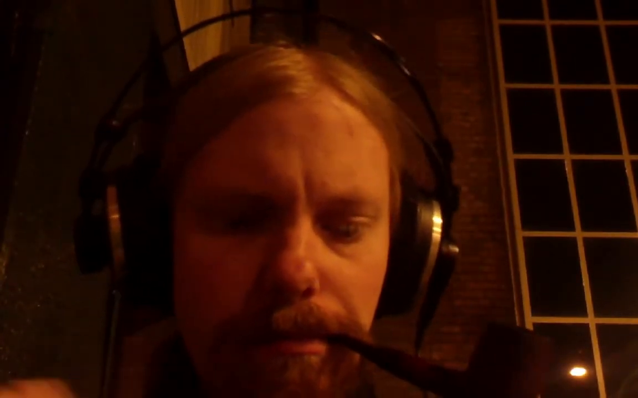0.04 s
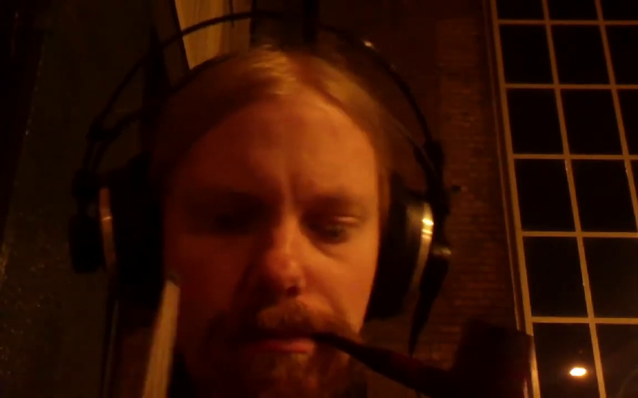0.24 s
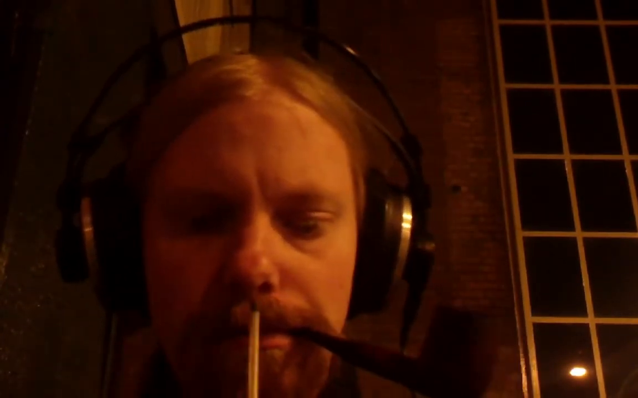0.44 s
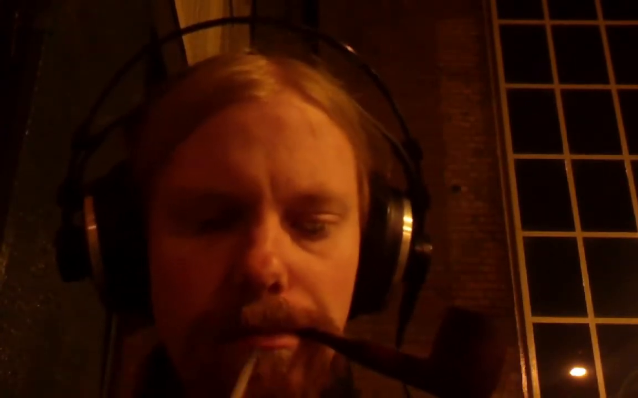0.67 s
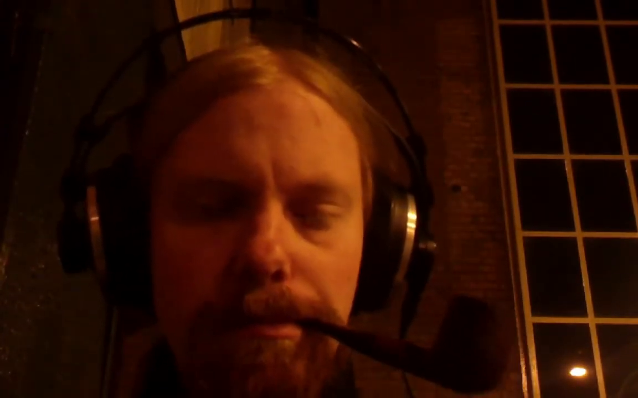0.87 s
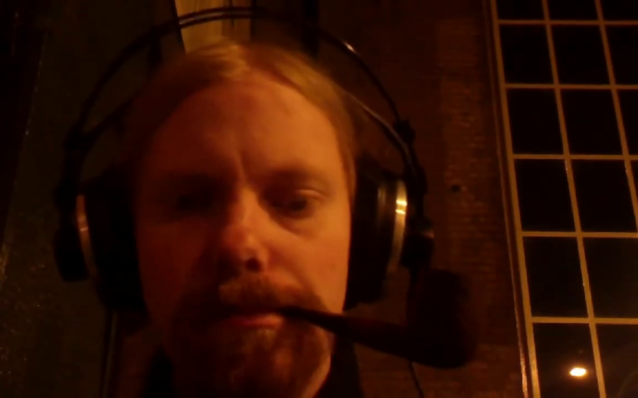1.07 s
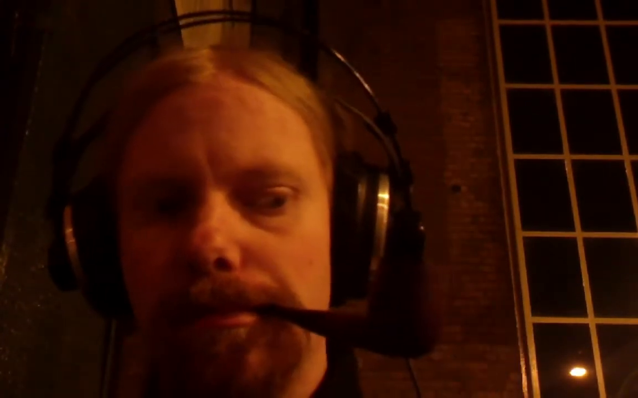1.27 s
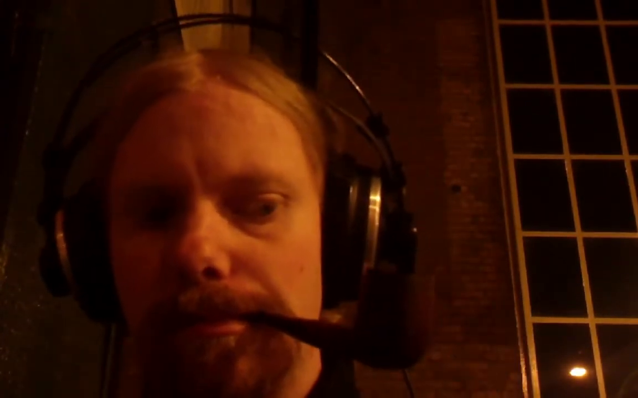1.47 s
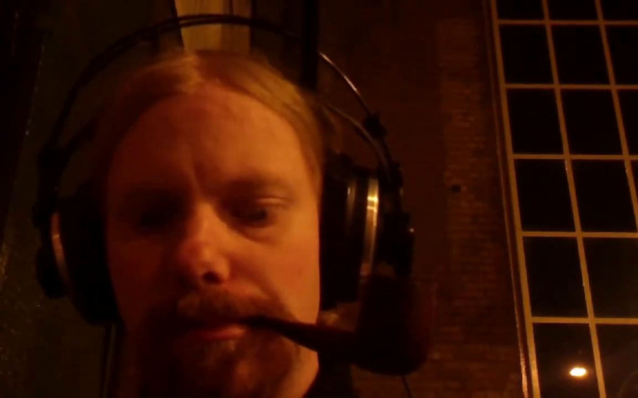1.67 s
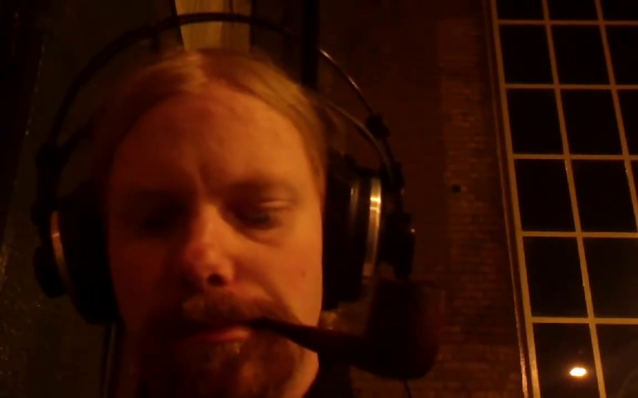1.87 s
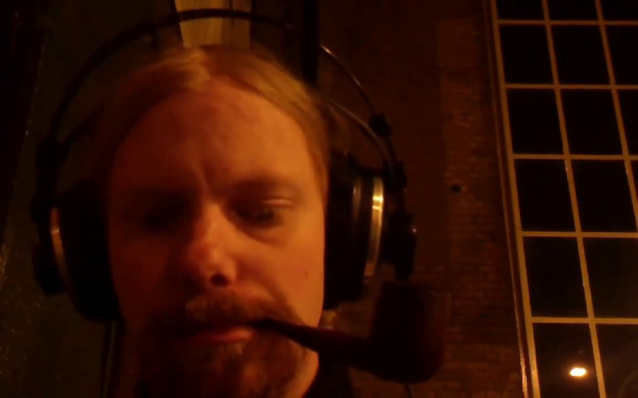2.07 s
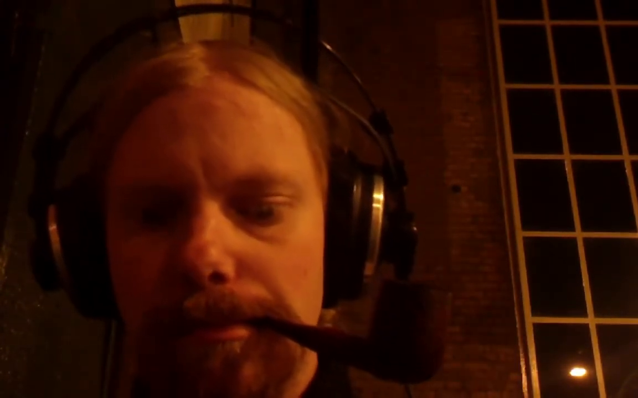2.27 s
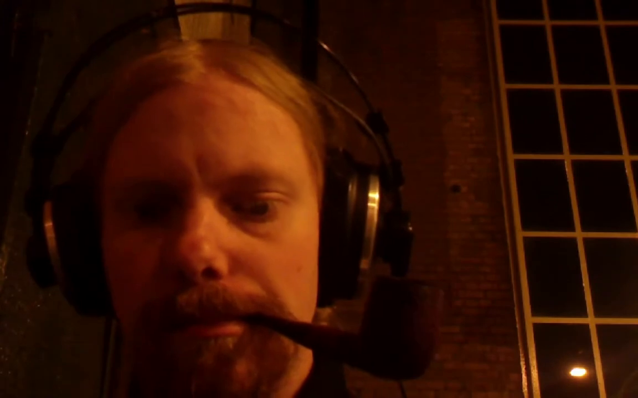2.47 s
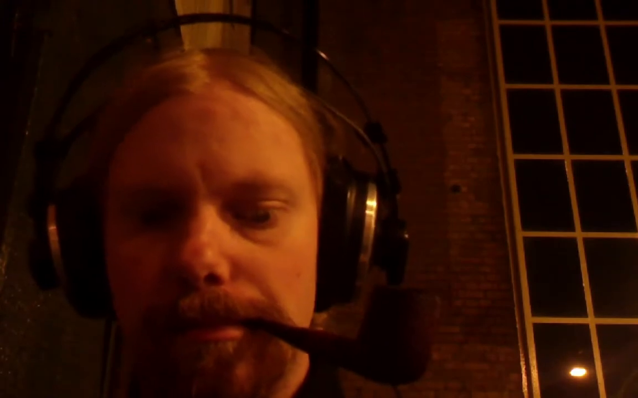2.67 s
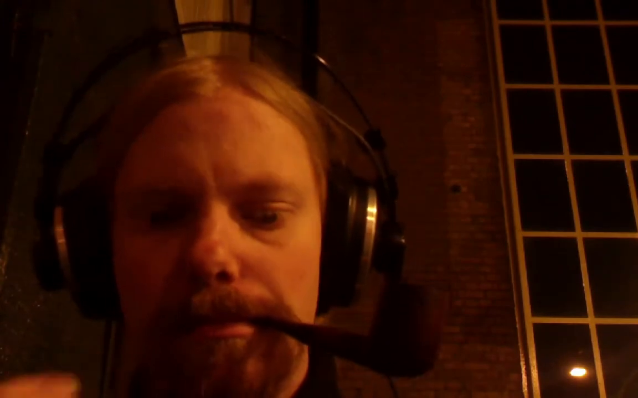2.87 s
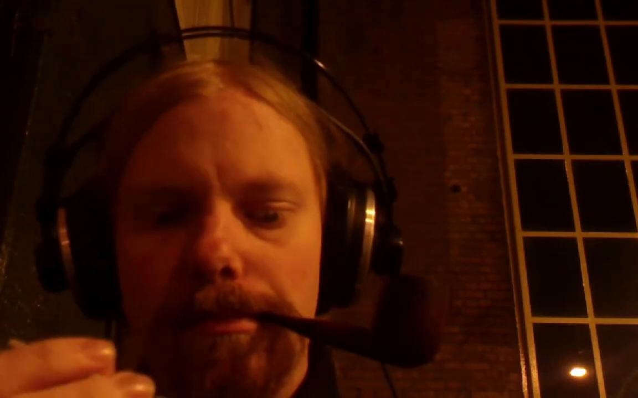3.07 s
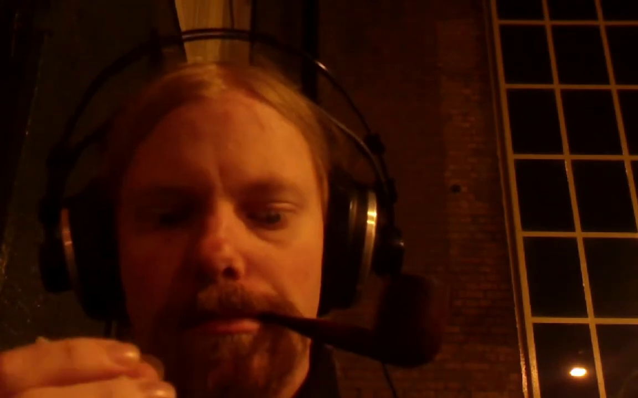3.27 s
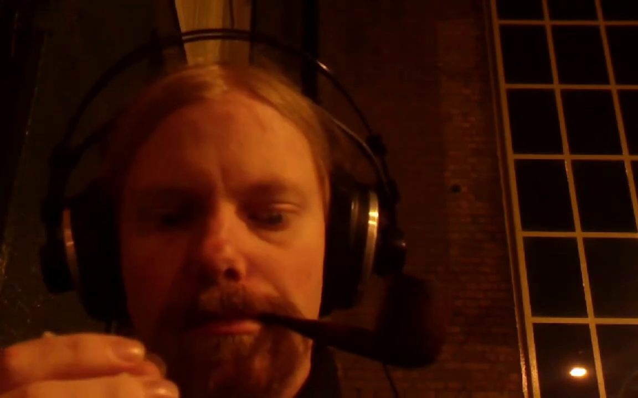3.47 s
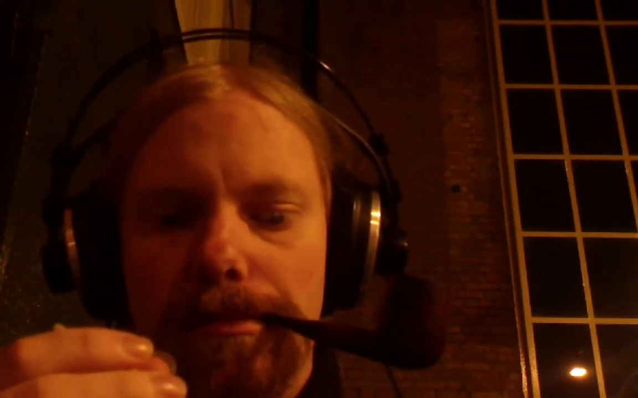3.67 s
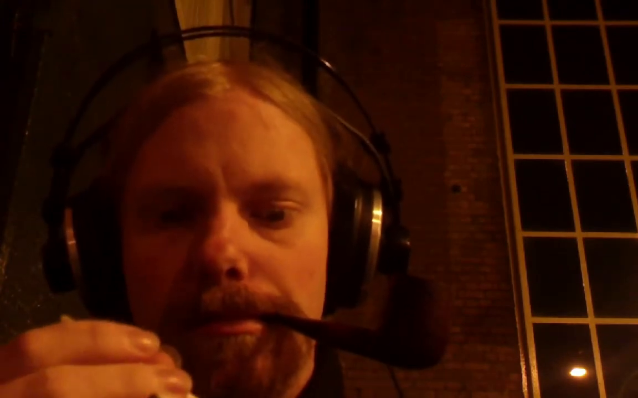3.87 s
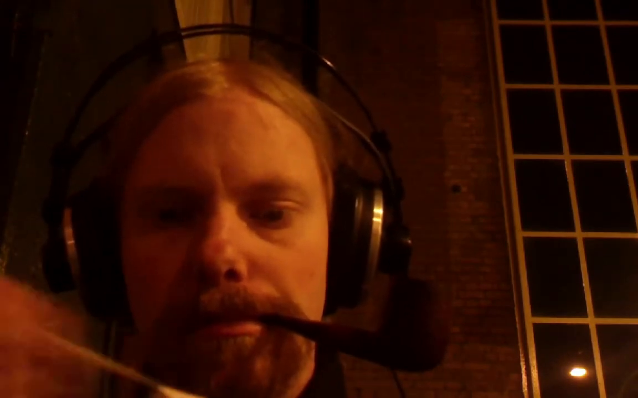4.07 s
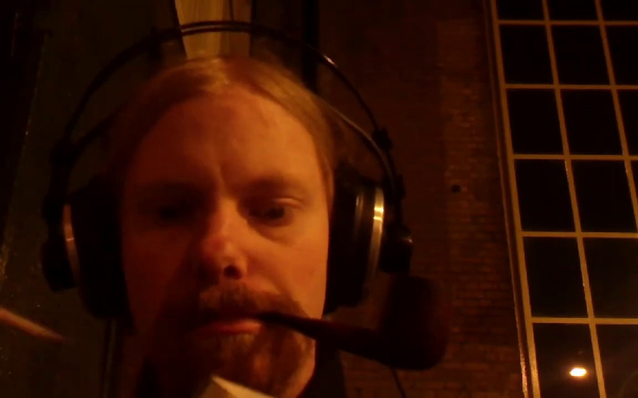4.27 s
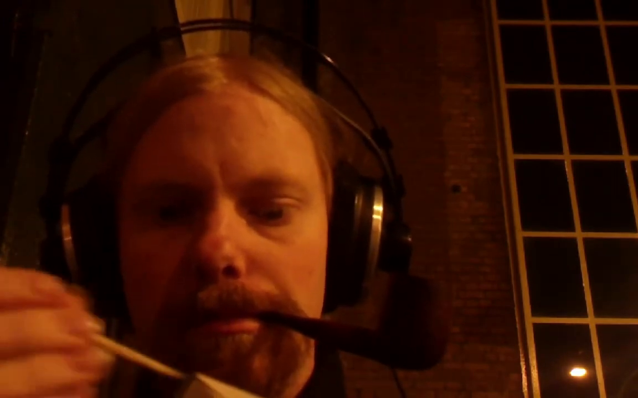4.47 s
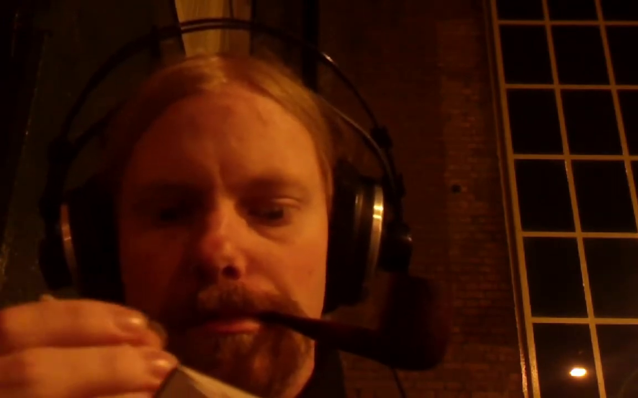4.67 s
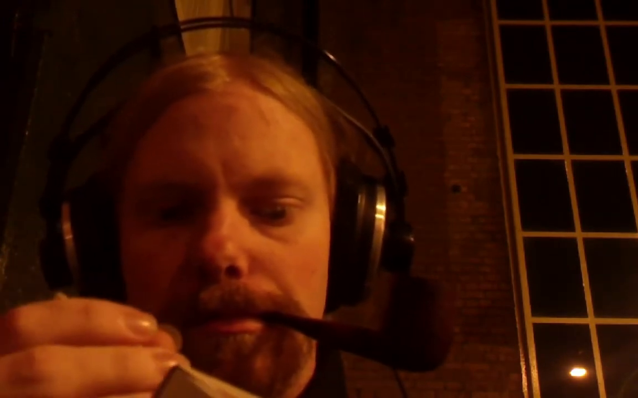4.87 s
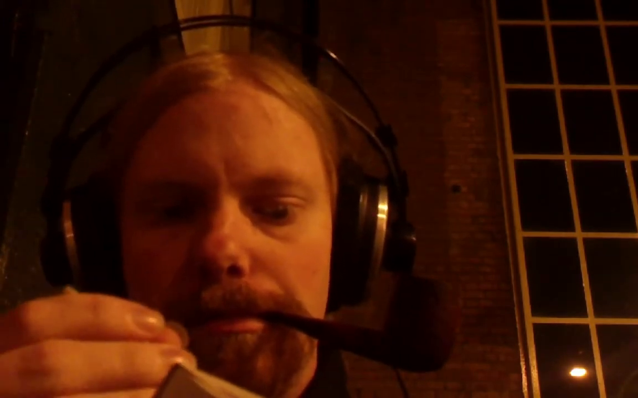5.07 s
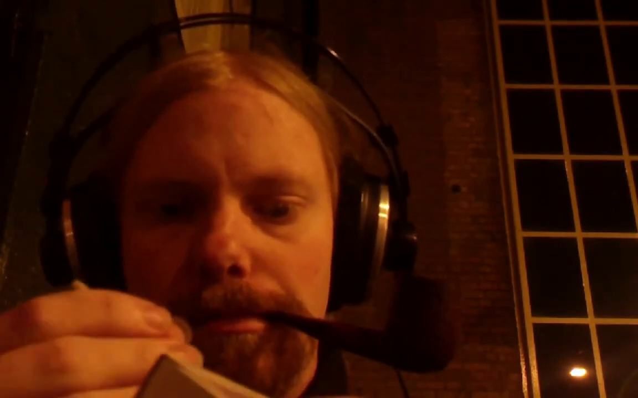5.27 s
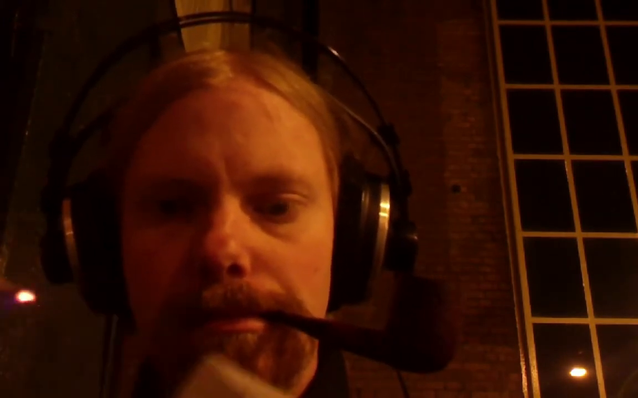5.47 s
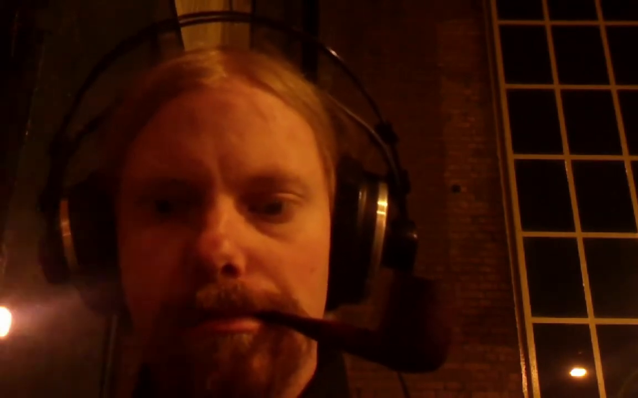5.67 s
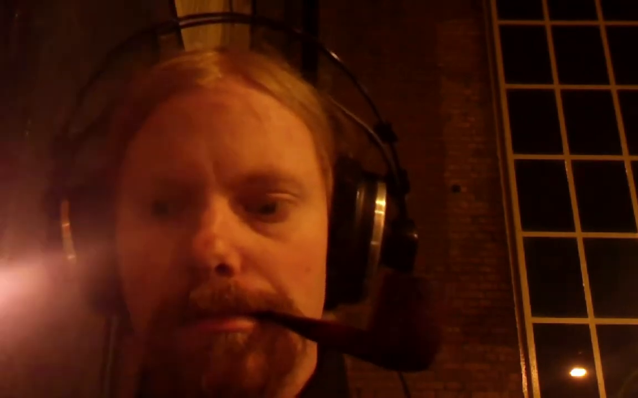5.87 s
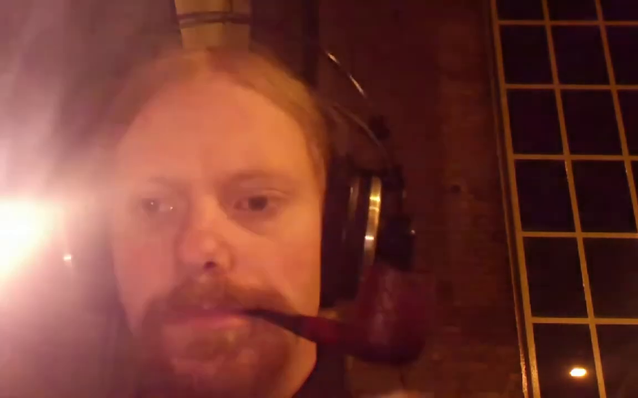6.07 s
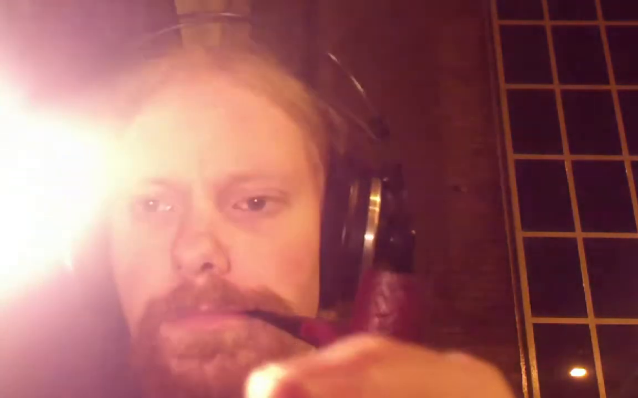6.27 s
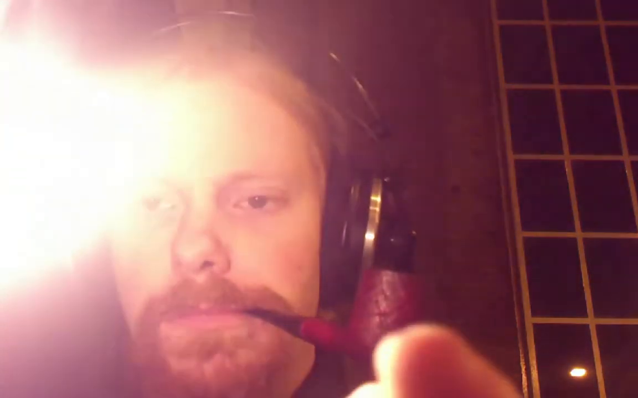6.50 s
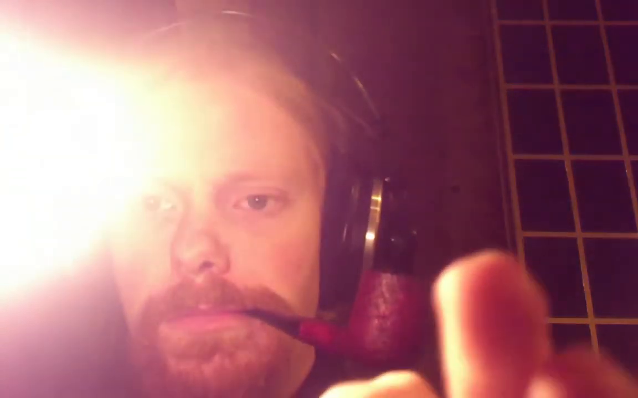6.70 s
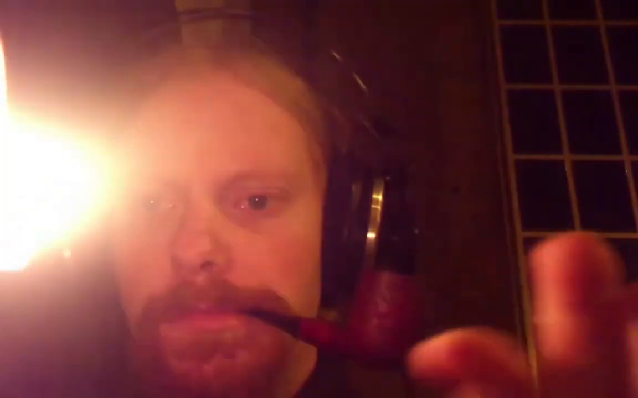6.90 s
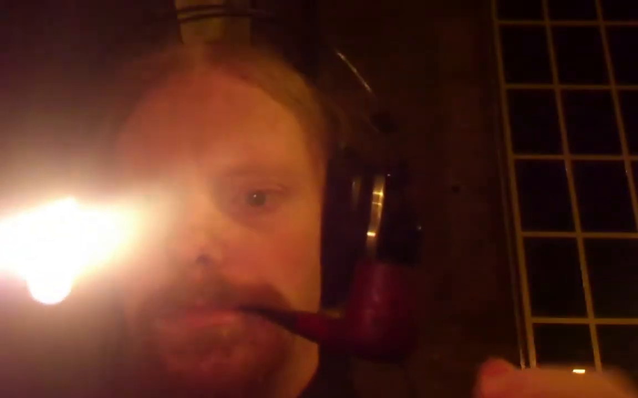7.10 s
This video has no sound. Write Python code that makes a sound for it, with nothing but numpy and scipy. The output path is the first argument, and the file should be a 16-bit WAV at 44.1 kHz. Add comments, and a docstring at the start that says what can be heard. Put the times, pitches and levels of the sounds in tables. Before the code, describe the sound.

A quiet room with low rumble, a little hiss and wavering mains hum, heard very close in stereo. A very faint mid-pitched tone lasts until 0.3 s, when a matchbox drawer slides shut with a short, gritty, boxy scrape ending at 0.42. From 0.55 to 2.9 fingers turn the box: soft cardboard swipes, hollow little taps, dry matchstick ticks, the sharpest click at 2.68. Isolated ticks follow near 3.2, 3.5 and 3.55. At 4.02 a very short scratch misses, ending in a snap; a woody tick comes at 4.73 and light taps at 5.2. At 5.32 a harsh, much louder strike cracks and catches. A faint fizz grows, with pops from 5.67, and flares in crackling, sputtering gas around 6.0-6.15. Dull low puffs land at 6.2 and 6.3, then a weakening sizzle ends with a tiny spurt near 6.77, leaving a faint finger rub at 6.95 and room rumble.

```python
"""A matchbox is slid shut and turned in the fingers, then a match is struck twice along its side; the second
stroke catches, and the head fizzes, flares and puffs alight, close to a small two-port microphone.
Juddering grit rings the modes of the box; knocks, ticks and dragging skin are the fingers; dense tiny bursts,
sputtering gas, pops and dull puffs are the fire. Low room rumble and mains hum lie under it, and a faint
tone sounds until the drawer moves."""
import sys
import numpy as np
from scipy import signal
from scipy.fft import rfft, irfft, next_fast_len
from scipy.io import wavfile
from scipy.ndimage import uniform_filter1d, map_coordinates

SR = 44100
rng = np.random.default_rng(int(sys.argv[2]) if len(sys.argv) > 2 else 0)


def unload_wav(signal):
    """Save mono or channel-first audio to the path in sys.argv[1] as 16-bit WAV at rate SR, clipped to [-1, 1]."""
    wavfile.write(
        sys.argv[1],
        SR,
        np.round(np.clip(np.atleast_2d(signal).T, -1, 1) * 32767).astype(np.int16),
    )


N = 314874
T = np.arange(N) / SR
M = next_fast_len(N, True)  # transform length
HZ = np.maximum(np.arange(M // 2 + 1) * SR / M, 1)

# strokes: the drawer slides shut, the match misses, the match catches:
# (start [s], attack [s], end [s], release [s], level [dB], easing midway [dB],
#  low body at the start [dB], low body at the end [dB])
STROKES = [(.298, .023, .421, .012, -36.3, 2.6, 2, 2), (4.021, .022, 4.073, .009, -36, 1.3, -5, 5),
           (5.318, .032, 5.384, .006, -28.3, 1, -1.5, 4)]
# pockets of gas pop on the head: (time [s], peak level [dB], brightness [Hz], t60 [s])
POPS = [(5.672, -31, 2400, .014), (5.878, -37, 7000, .012), (5.900, -34, 8000, .008),
        (6.005, -29, 1800, .012), (6.023, -30, 900, .018), (6.039, -29.5, 1000, .012),
        (6.058, -28, 800, .008), (6.085, -24, 2200, .028), (6.094, -25, 7000, .007),
        (6.110, -24.5, 5000, .009), (6.144, -30, 5000, .012), (6.150, -32, 2500, .008),
        (6.167, -33, 11000, .005), (6.1965, -28, 4000, .011)]
# the fire on the head flares, is spent, and dies away with this time constant
FLARE_S, SPENT_S, DIE_S = 6.06, 6.772, 0.015


def matchbox():
    """The drawer and both strokes scrape and ring the box; sudden snags within them knock it harder."""
    # modes of the box with its drawer open: (frequency [Hz], width [Hz], level [dB])
    drawer_open = [(960, 150, -7), (1170, 160, 12), (1900, 400, 1), (2500, 500, -3), (2900, 400, -7),
                   (3750, 550, 4.5), (4200, 400, -3), (5450, 600, -4), (7200, 1200, -9), (9800, 1900, -7)]
    # the same modes once the drawer is home: (frequency [Hz], width [Hz], level [dB])
    drawer_shut = [(920, 140, 4), (1230, 150, -7), (1800, 350, -3), (2320, 350, 2), (2760, 400, -6),
                   (3620, 430, -1), (4200, 500, -6), (5530, 1300, -5), (6900, 1200, -4), (9550, 1500, -0.5)]
    # modes of the box as held for the failed stroke: (frequency [Hz], width [Hz], level [dB])
    miss_box = [(900, 72, 4.5), (1100, 180, 1.5), (1780, 230, 3.5), (2410, 220, -4), (2620, 170, -14),
                (3520, 400, -7), (4100, 460, -14), (5630, 700, -15.5), (9900, 980, -6)]
    # modes of the box as held for the stroke that catches: (frequency [Hz], width [Hz], level [dB])
    strike_box = [(595, 29, 6.5), (776, 170, 6.5), (1170, 167, 10), (1780, 200, 6), (2400, 310, 5.5),
                  (3400, 1600, -2), (4100, 300, -1), (5600, 500, 0), (7270, 960, -3), (9360, 1150, 4.5)]
    # the drawer jerks, or the head snags on the strip or snaps off its edge:
    # (time [s], peak level [dB], brightness [Hz], t60 [s])
    snags = [(.3178, -25, 1700, .016), (.410, -34, 2300, .018), (.422, -30, 1000, .025),
             (4.0415, -27, 11000, .02), (4.062, -29, 1800, .025), (4.0726, -16.5, 1150, .013),
             (5.3500, -20, 9000, .015), (5.3555, -15, 10000, .003), (5.3635, -21, 900, .02),
             (5.3658, -5.8, 9500, .014), (5.3822, -16, 2200, .009)]
    slide, miss, strike = STROKES
    out = scrape(slide, drawer_open, drawer_shut, rate=9000, spread_db=0.5, grit_db=-12, judder_db=1.3, count=3)
    out = out + scrape(miss, miss_box, miss_box, rate=8300, spread_db=2.5, grit_db=-11, judder_db=1.8)
    out = out + scrape(strike, strike_box, strike_box, rate=15000, spread_db=2.5, grit_db=-6.0, judder_db=0.7)

    miss_cut_hz = 700  # the tightly held box has no note below this
    miss_response = body(miss_box) * bass_cut(miss_cut_hz) ** 3
    rings = [irfft(response) for response in (body(drawer_open), miss_response, body(strike_box))]
    for snag in snags:
        stroke_index = np.searchsorted([miss[0], strike[0]], snag[0])
        out = out + burst(*snag, rings[stroke_index])
    return out


def scrape(stroke, first, last, rate, spread_db, grit_db, judder_db, count=1):
    """Grit slips unevenly and rings modes gliding from first to last, as contact builds, eases and lets go."""
    start, attack, end, release_s, db, easing_db, body_start_db, body_end_db = stroke
    press_power = 1.4  # pressure builds along a power curve
    press = np.clip((T - start) / attack, 0, 1) ** press_power
    along = np.clip((T - start - attack) / (end - start - attack), 0, 1)
    # pressure drops fast and leaves a light drag
    drag_db, drag_s = -17, 0.064
    let_go = np.maximum(release(end, release_s), undb(drag_db) * release(end, drag_s))

    judder_hz = 330
    slips = grains(rate, spread_db) * undb(judder_db * walk(judder_hz))
    grit = undb(grit_db) * resonance(7600, 9300)
    sound = 0
    for k, modes in enumerate(np.linspace(first, last, count)):
        nearness = np.maximum(1 - np.abs(along * (count - 1) - k), 0)  # crossfade between sets of modes
        sound = sound + unit(through(slips, body(modes) + grit)) * nearness

    body_hz = 1970  # below this the walls sound, and their level shifts along the stroke
    low = through(sound, 1 / (1 + (HZ / body_hz) ** 8))
    sound = sound - low + low * undb(body_start_db + (body_end_db - body_start_db) * along)
    return sound * press * let_go * undb(db - easing_db * np.sin(np.pi * along))


def fingers(rub_db=-0.5, skin_db=-1.5, grip_treble_db=-6.0):
    """Soft knocks, dry ticks and skin dragging over cardboard; the note of the box changes with the grip."""
    # what a tapped box rings with: (frequency [Hz], width [Hz], level [dB])
    tap_box = [(730, 94, -2), (1010, 220, 1), (1840, 150, -8), (2600, 500, -11)]
    # fingertips knock the box: (time [s], peak level [dB], brightness [Hz])
    taps = [(.303, -41, 1100), (.608, -39.5, 1000), (0.663, -46, 1200), (1.178, -43, 750),
            (1.346, -42, 990), (1.379, -38, 800), (2.025, -38, 1190), (2.232, -45, 900), (2.303, -43, 1050),
            (2.313, -35.5, 850), (2.407, -40, 680), (2.711, -41.5, 750), (5.190, -41.5, 1000),
            (5.204, -40.5, 960), (5.423, -41, 1000)]
    # the matchstick ticks against the box: (time [s], peak level [dB], brightness [Hz],
    # ring of the stick [Hz], its level [dB], rattle afterwards relative to the contact [dB])
    ticks = [(.567, -45, 4500, 4000, 0, -24), (.912, -45, 2500, 3000, -4, -24),
             (1.384, -39, 4000, 4200, -4, -22), (2.027, -40, 2200, 4000, -6, -24),
             (2.125, -44, 12000, 12500, -4, -24), (2.233, -42, 3000, 3800, 0, -28),
             (2.313, -35, 2500, 2500, -2, -30), (2.642, -34, 9500, 8000, -4, -28),
             (2.6724, -40, 5000, 4200, -2, -20), (2.6759, -20.5, 4500, 4600, -2, -36),
             (3.1924, -32, 1900, 2400, -5, -31), (3.4880, -34, 3000, 3580, 4, -35),
             (3.555, -38.5, 1900, 3600, -4, -31), (4.7329, -28.5, 1900, 4120, 9, -40),
             (5.204, -46, 3000, 3700, -2, -26)]
    # fingers swipe over the cardboard: (middle [s], length [s], level [dB], treble relative to it [dB],
    # note of the hollow box [Hz], its relative level [dB], rasp of the wall, relative [dB])
    swipes = [(0.142, 0.14, -60.5, -1.5, 1020, -26, -10), (0.597, 0.026, -55.5, 0.5, 990, -13, -12),
              (0.799, 0.056, -47.5, -3.5, 963, -5.5, -13.5), (1.019, 0.073, -54, -4.5, 644, -10, -12),
              (1.134, 0.077, -55, 3.5, 650, -21, -15), (1.285, 0.09, -68.5, 7, 750, -5, -15),
              (1.378, 0.048, -50.5, -8, 750, -3.5, -11), (2.019, 0.051, -59, -5, 810, -3, -6.5),
              (2.296, 0.04, -51.5, -6, 1020, -3, 0), (2.835, 0.03, -62.5, 2, 1000, -12, -15),
              (4.13, 0.09, -63, 0, 950, -12, -8), (6.953, 0.27, -64, -6, 920, -2.5, -21)]
    # colour of rubbed cardboard: (frequency [Hz], level [dB])
    rub_colour = [(350, -17), (600, -4), (1010, -4.5), (1250, -10), (1510, -10), (2300, -13), (3700, -14),
                  (4790, -16.5), (7000, -17.5), (9500, -25), (15400, -60)]

    box_ring = irfft(body(tap_box))
    hits = sum(burst(s, db, hz, 0.0026, box_ring, order=2) for s, db, hz in taps)
    hits = hits + sum(tick(*row) for row in ticks)

    drag = grains(9000, spread_db=1.6) * undb(0.75 * walk(160))
    hollow_width_hz = 260
    low, hollow, rasp = grip(), 0, 0
    high = low * undb(grip_treble_db)
    for s, length, db, treble_db, note_hz, note_db, rasp_db in swipes:
        speed = np.exp(-2 * ((T - s) / length) ** 2)
        low = np.hypot(low, speed * undb(db))
        high = np.hypot(high, speed * undb(db + treble_db))
        note = unit(through(drag, resonance(note_hz, hollow_width_hz) ** 2))
        hollow = hollow + note * speed * undb(db + note_db)
        rasp = rasp + speed * undb(db + rasp_db)

    # the wall of the box rasps under a dragging finger
    wall = unit(through(grains(1000, spread_db=1.8), resonance(2220, 1000) ** 2)) * rasp
    cardboard = unit(through(drag, colour(rub_colour))) * undb(rub_db) * low
    skin = unit(through(grains(9000, spread_db=2.0), resonance(10040, 5100) ** 2)) * undb(skin_db) * high
    return hits + cardboard + hollow + wall + skin


def tick(s, db, hz, stick_hz, stick_db, rattle_db, size=8192):
    """One hard contact and a short rattle ring the box and the free end of the stick; mid and side."""
    # what the box rings with under the stick: (frequency [Hz], width [Hz], level [dB])
    tick_box = [(920, 240, 3), (1850, 300, 0), (2130, 300, 1), (3600, 260, -2), (5300, 800, -13),
                (7200, 600, -19), (10000, 2200, -6.5)]
    stick_width_hz, rattle_t60 = 130, 0.096
    push = rng.standard_normal((2, size)) * undb(rattle_db - 60 * T[:size] / rattle_t60)
    push[0, 0] += 1  # the hard contact, in the mid only
    ring = body(tick_box) + undb(stick_db) * resonance(stick_hz, stick_width_hz)
    sound = through(push, ring * resonance(hz, 2 * hz))
    return np.roll(sound, int(s * SR), axis=1) * undb(db) / np.abs(sound[0]).max()


def grip():
    """Strength of light friction as the shut box shifts in the grip, ever less as the hand settles."""
    level_db, settles_s, fade_db_per_s, end_s = -60.5, 1.23, 5.5, 2.88
    held = (T > STROKES[0][2]) * release(end_s, 0.055)
    return held * undb(level_db - fade_db_per_s * np.maximum(T - settles_s, 0))


def flame(flutter_db=1.0, puff_top_hz=1300):
    """Tiny bursts fizz and crackle, gas sputters and pops, beads sizzle, then dull puffs set the flame alight."""
    # colour of the fizzing head: (frequency [Hz], level [dB])
    fizz_colour = [(880, -20), (1500, -5), (1800, -3.5), (2500, 1.5), (3280, -6.5), (3800, -5), (5950, -2),
                   (8130, -4), (10300, -0.5), (12000, -5), (14500, -12.5), (15500, -18)]
    # colour of the gas jet: (frequency [Hz], level [dB])
    jet_colour = [(180, -43), (300, -8), (360, -10.5), (500, -4), (700, -3.5), (986, 0), (1210, -6.5),
                  (1400, -24), (1860, -5), (2180, -6), (2900, -16), (3550, -8.5), (4300, -18), (5850, -27),
                  (9900, -120)]
    # what a pop rings with: (frequency [Hz], width [Hz], level [dB])
    pop_body = [(960, 200, 7), (2130, 460, 6.5), (3670, 510, -3), (5500, 2000, -7)]
    # the flame takes hold in dull puffs: (time [s], peak level [dB], brightness [Hz], t60 [s])
    puffs = [(6.207, -28.5, 520, .052), (6.310, -36, 380, .08)]
    # the air around the flame resounds: (frequency [Hz], width [Hz], level [dB])
    puff_body = [(86, 29, 14), (260, 340, -4), (570, 300, -4.5), (930, 51, 4)]
    fizz_gain, jet_gain = burning()

    sparks = unit(grains(11000, spread_db=-0.5) * undb(0.6 * walk(70)))
    crackle = undb(-3) * unit(grains(450, spread_db=2.2))  # single sparks stand out of the fizz
    fizz = unit(through(sparks + crackle, colour(fizz_colour)))
    fizz_top_hz, fizz_dulls_s = 11400, 1.2  # the top of the fizz fades after the flare
    top = through(fizz, 1 - 1 / (1 + (HZ / fizz_top_hz) ** 20))
    fizz = fizz - top * (1 - release(FLARE_S, fizz_dulls_s))

    # gas leaves in quick, uneven sputters, each fading by sputter_db before the next
    sputter_hz, sputter_db = 72, 11
    cycle = np.cumsum(sputter_hz * (1 + .15 * walk(40))) / SR % 1
    gas = rng.standard_normal((2, N)) * undb(flutter_db * walk(70) - sputter_db * cycle)
    jet = unit(through(gas, colour(jet_colour)))

    pop_ring = irfft(body(pop_body))
    puff_ring = irfft(body(puff_body) / (1 + 1j * HZ / puff_top_hz) ** 2)
    bursts = sum(burst(*pop, pop_ring) for pop in POPS) + sum(burst(*puff, puff_ring) for puff in puffs)

    # low eddies trail each puff
    wake_hz, wake_db, wake_s = 170, -13, 0.047
    wake = sum(undb(db + wake_db) * (T > s) * release(s, wake_s) for s, db, hz, t60 in puffs)
    eddies = unit(through(gas, resonance(wake_hz, 2 * wake_hz) ** 2)) * wake
    return fizz * fizz_gain + sizzle() + jet * jet_gain + bursts + eddies


def burning():
    """Strength of fizz and gas jet: the fire spreads, flares, sinks back and is spent, with spurts on the way."""
    # spurts of gas from the head: (time [s], decay [s], fizz level [dB], jet level [dB])
    spurts = [(5.830, 0.024, -47, -65), (5.89, .025, -45, -70), (6.005, 0.026, -44.5, -42.5),
              (6.110, 0.019, -36.5, -41.5), (6.146, 0.04, -48.5, -45), (6.210, 0.025, -48, -41),
              (6.315, 0.065, -51, -47), (6.762, 0.022, -48.5, -61)]
    start_db, flare_db, late_db = -55, -45.5, -50.5
    spread_s, sink_s, spurt_rise_s = 0.45, 0.15, 0.018
    spreading = start_db + (flare_db - start_db) * swell(FLARE_S, spread_s)
    sinking = late_db + (flare_db - late_db) * swell(FLARE_S, sink_s)
    fizz = undb(np.where(T < FLARE_S, spreading, sinking))

    # the jet follows the fizz and rushes out around the flare
    jet_under_fizz_db, jet_flare_db, jet_flare_s = -8.5, -40, 0.089
    jet = np.hypot(fizz * undb(jet_under_fizz_db), undb(jet_flare_db) * swell(FLARE_S, jet_flare_s))
    for s, decay_s, fizz_db, jet_db in spurts:
        spurt = np.where(T < s, swell(s, spurt_rise_s), release(s, decay_s))
        fizz = np.hypot(fizz, spurt * undb(fizz_db))
        jet = np.hypot(jet, spurt * undb(jet_db))
    alight = (T > STROKES[-1][2]) * release(SPENT_S, DIE_S)
    return fizz * alight, jet * alight


def sizzle():
    """Molten beads hiss roughly, drifting in pitch and flickering, from the first pop until the head is spent."""
    # hisses of the beads: (frequency [Hz], width [Hz], level [dB])
    beads = [(3830, 920, -0.5), (5260, 1300, -0.5), (6730, 1700, -1.5)]
    level_db, drift, flicker_db = -53.7, .035, 1.3  # drift is a fraction of the pitch
    out = 0
    for hz, width, db in beads:
        hiss = unit(through(grains(3500, spread_db=0.0), resonance(hz, width) ** 2))
        place = np.cumsum(1 + drift * walk(12))  # uneven reading speed bends the pitch
        drifting = np.array([map_coordinates(part, [place], order=2, mode="mirror") for part in hiss])
        out = out + drifting * undb(db + flicker_db * walk(35))
    fade_in = np.clip((T - POPS[0][0]) / .02, 0, 1)
    return unit(out) * undb(level_db) * fade_in * release(SPENT_S, DIE_S)


def faint_tone(hz=705, db=-61):
    """A faint sine, wavering in level and phase, that fades out just before the drawer moves."""
    fade_out = np.clip((STROKES[0][0] - T) / 0.014, 0, 1)
    return undb(db + 0.88 * walk(29)) * np.sin(2 * np.pi * hz * T + .5 * walk(26)) * fade_out


def room(level_db=-53.5, hum_trim_db=-2):
    """Rumble shared by both ports, hiss of their own, and wavering mains hum whose lowest note swells."""
    # colour of the room air: (frequency [Hz], level [dB])
    air_colour = [(15, -37), (25, -6), (48, -7), (82, -8), (119, -8), (152, -14.5), (240, -16.5),
                  (421, -21.5), (523, -21), (1020, -29.5), (1660, -35), (2170, -38), (3340, -40),
                  (5430, -44), (15500, -45.5)]
    # partials of the hum, the first at the height of its swell: (frequency [Hz], level before the trim [dB])
    partials = [(50.4, -52), (119.5, -62), (200, -67.5), (239, -65.5)]
    apart = np.interp(np.log(HZ), np.log([100, 700, 3000]), [.21, .42, .9])  # the ports differ more in the treble
    mid = through(rng.standard_normal(N) * undb(.5 * walk(4.17)), colour(air_colour))
    side = through(rng.standard_normal(N), colour(air_colour) * apart)
    gain = undb(level_db) / np.std(through(mid, HZ > 70))  # level set by the part above 70 Hz
    air = through(mid + np.array([[1], [-1]]) * side, HZ ** 2 / (HZ ** 2 + 55 ** 2)) * gain

    rest_db = -66  # lowest partial away from its swell, before the trim
    lowest = rest_db + (partials[0][1] - rest_db) * swell(3.76, 2.54)
    levels = [lowest] + [db for hz, db in partials[1:]]
    hum = 0
    for (hz, _), db in zip(partials, levels):
        strength = undb(db + hum_trim_db + 0.93 * walk(6.5))
        hum = hum + strength * np.sin(2 * np.pi * hz * T + 0.71 * walk(3.8))
    return air + np.sqrt(2) * hum  # sine levels are rms


def surroundings(x, wide_hz, near_db, pan_db, count=4):
    """Moving hands scatter the treble to each port in an ever-changing pattern; a faint room tail follows."""
    hands_move_hz = 9  # how often the pattern of near reflections changes
    near_t60, room_t60, room_tail_db = .012, .45, -20
    mid, side = x
    apart = HZ / np.hypot(HZ, wide_hz)
    scatter = undb(near_db) * apart
    sign = np.array([[1], [-1]])
    direct = through(mid + sign * through(side, apart), 1 / np.sqrt(1 + scatter ** 2))
    shares = np.array([walk(hands_move_hz) for _ in range(count)])
    shares = shares / np.linalg.norm(shares, axis=0)  # constant total power
    near = sum(share * through(direct, scatter * decay(near_t60)) for share in shares)
    tail = undb(room_tail_db) * through(direct, decay(room_t60))
    return (direct + near + tail) * undb(sign * pan_db / 2)


def decay(t60):
    """Response of a diffuse echo of unit energy, different at each port."""
    t = T[:SR // 2]
    echo = rng.standard_normal((2, len(t))) * undb(-60 * t / t60)
    return rfft(unit(echo), M) / np.sqrt(len(t))


def ports(x, left_db=1, right_db=0.0, left_top_db=5.5, right_top_db=-15, notch_db=-6):
    """The left port is bright; the right one has a dip in the middle and is dull above 7 kHz."""
    left = np.interp(HZ, [500, 1000, 6500, 9500, 15000], [0, left_db, left_db, left_top_db, left_db])
    right_hz = [500, 1300, 1650, 2100, 6400, 7600, 11000, 14500]
    right_gains = [0, right_db, notch_db, right_db, 3, right_top_db, right_top_db, right_top_db / 2]
    right = np.interp(HZ, right_hz, right_gains)
    return through(x, undb([left, right]))


def burst(s, db, hz, t60, ring, order=1, size=8192):
    """A dying cluster of slips, strongest near hz, sent through an impulse response; mid and side."""
    t = np.arange(size) / SR
    push = rng.standard_normal((2, size)) * undb(-60 * t / t60)
    hz = np.clip(hz, 100, SR / 4)
    band = [hz / 1.7, min(hz * 1.7, SR * .45)]
    push = signal.lfilter(*signal.butter(order, band, "band", fs=SR), push)
    sound = signal.fftconvolve(push, ring[None, :size])[:, :size]
    out, start = np.zeros((2, N + size)), int(s * SR)
    out[:, start:start + size] = undb(db) * sound / np.abs(sound).max(axis=1, keepdims=True)
    return out[:, :N]


def grains(rate, spread_db):
    """Tiny random clicks of unequal size, rate per second; each radiates its own way, as mid and side."""
    sizes = undb(spread_db * np.minimum(rng.exponential(size=N), 5))
    return (rng.random(N) < rate / SR) * sizes * rng.standard_normal((2, N))


def walk(rate):
    """Smooth chance with a spread near 1, reaching a new random value rate times a second."""
    k = max(int(SR / rate), 1)
    steps = np.repeat(rng.standard_normal(N // k + 1), k)
    return 1.3 * uniform_filter1d(steps, k)[:N]


def swell(s, length):
    """A smooth rise and fall around a moment."""
    return np.exp(-((T - s) / length) ** 2)


def release(s, decay_s):
    """Full until a moment, then dying away exponentially."""
    return np.exp(-np.clip((T - s) / decay_s, 0, 30))


def resonance(hz, width):
    """Response of one damped resonance, gain 1 at its centre."""
    return 1 / (1 + 1j * (HZ ** 2 - hz ** 2) / (HZ * width))


def body(modes):
    """Response of a set of resonances summed in phase at their centres, with deep valleys between them."""
    return sum(undb(db) * resonance(hz, width) for hz, width, db in modes)


def colour(points):
    """Response of (frequency [Hz], level [dB]) points, falling steeply outside them."""
    hz, db = np.transpose(points)
    outside = np.minimum(HZ / hz[0], 1) * np.minimum(hz[-1] / HZ, 1)
    return undb(np.interp(np.log(HZ), np.log(hz), db)) * outside ** 3


def bass_cut(hz):
    """Response of a second-order high-pass."""
    return 1 / (1 - 1j * hz / HZ * np.sqrt(2) - (hz / HZ) ** 2)


def through(x, response):
    """Filter by a frequency response."""
    return irfft(rfft(x, M) * response, M)[..., :N]


def unit(x):
    """Scale to rms 1."""
    return x / np.sqrt(np.mean(x ** 2))


def undb(db):
    """Decibels to gain."""
    return 10 ** (np.asarray(db) / 20)


def scene(box_cut_hz=450):
    """Box, fingers and flame close to the ports, over the room."""
    handling = through(matchbox() + fingers(), bass_cut(box_cut_hz))  # a small box radiates little bass
    box = surroundings(handling, wide_hz=3020, near_db=-1.5, pan_db=1.3)
    fire = surroundings(flame(), wide_hz=2620, near_db=-9.5, pan_db=1.0)
    return ports(box + fire) + room() + faint_tone()


def record(dry):
    """The recorder cuts the top with a steep low-pass at 15.6 kHz."""
    return signal.sosfilt(signal.ellip(8, .2, 70, 15600, fs=SR, output="sos"), dry)


dry = scene()
out = record(dry)
unload_wav(out)
```